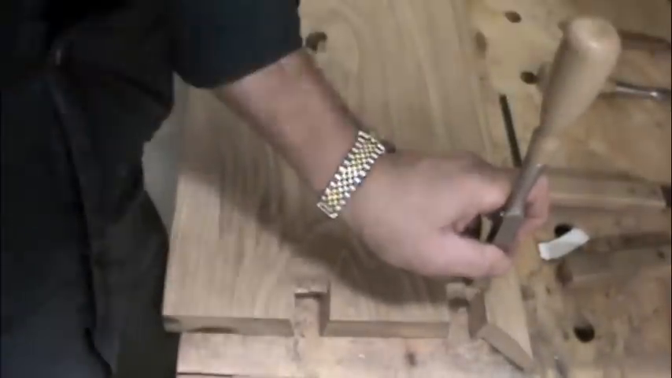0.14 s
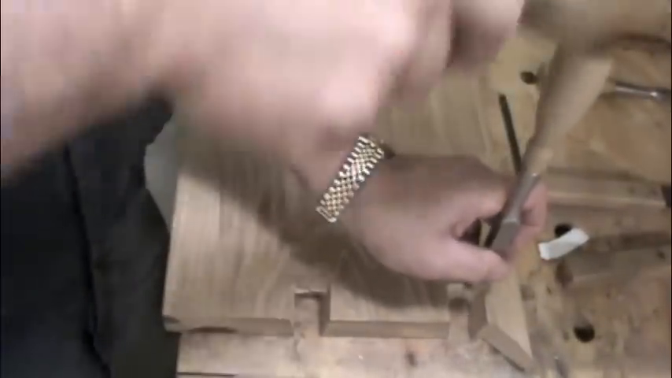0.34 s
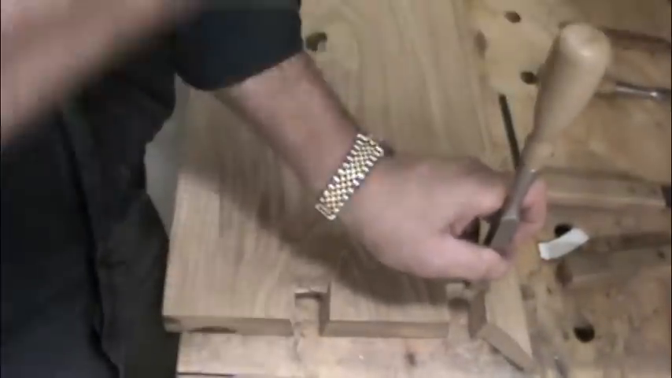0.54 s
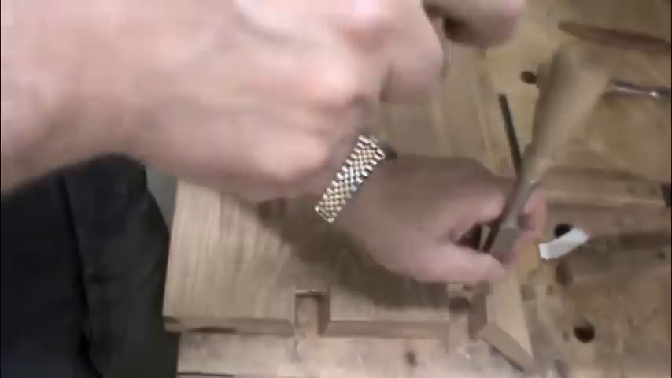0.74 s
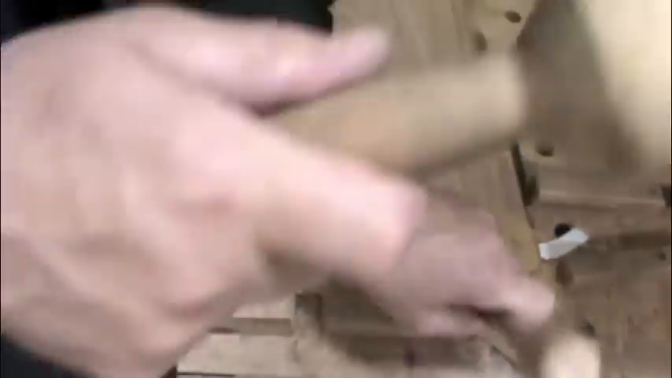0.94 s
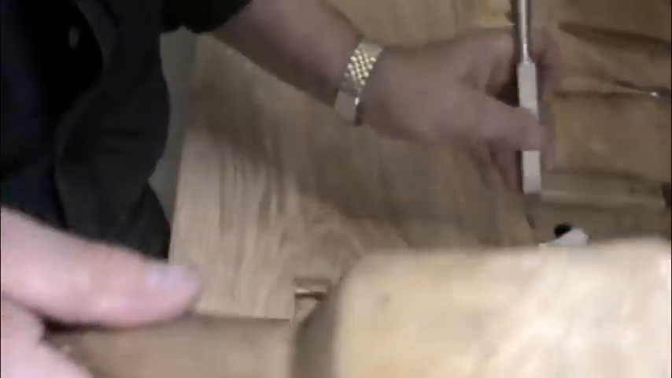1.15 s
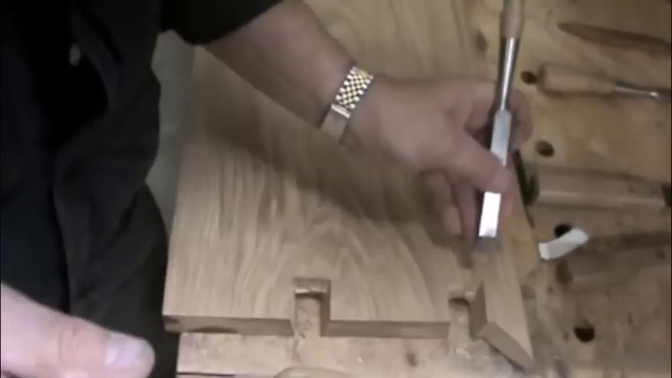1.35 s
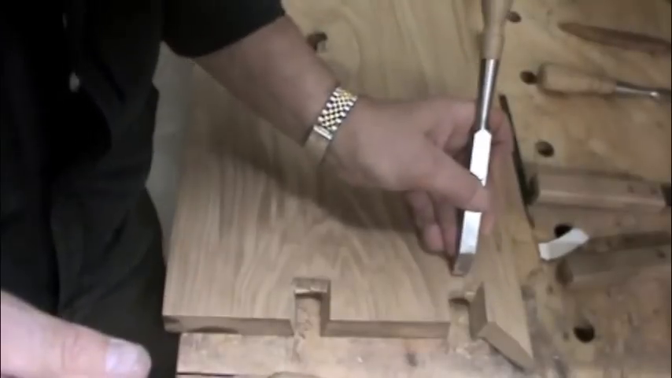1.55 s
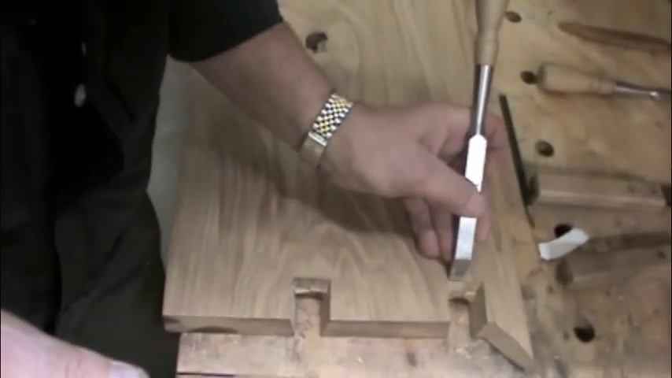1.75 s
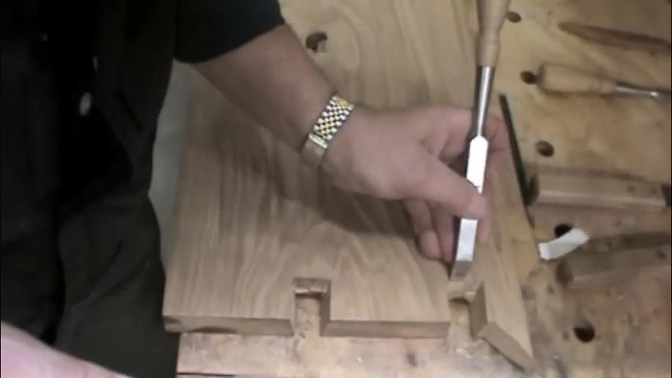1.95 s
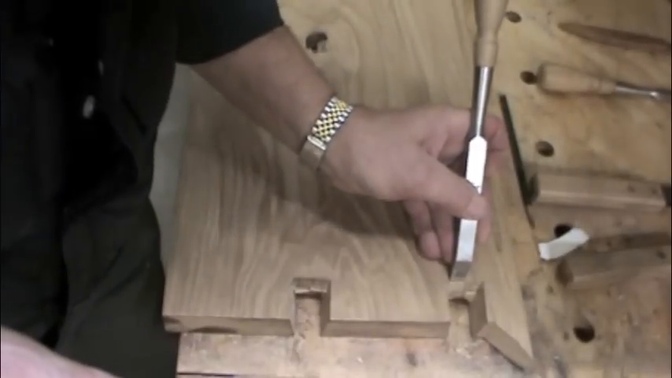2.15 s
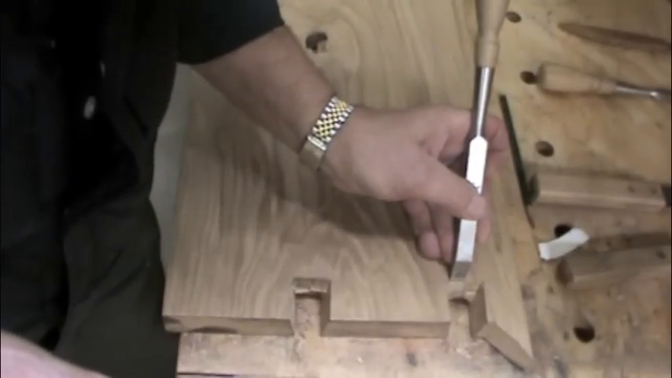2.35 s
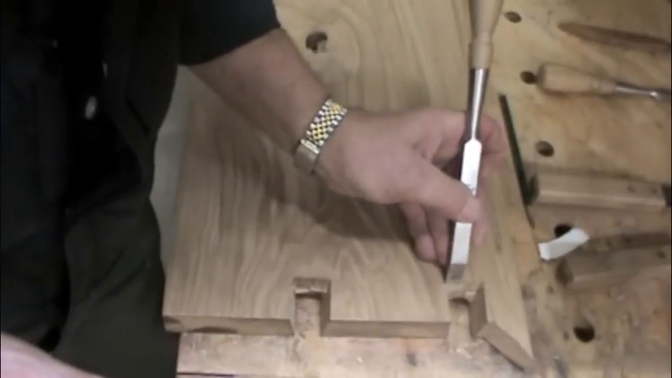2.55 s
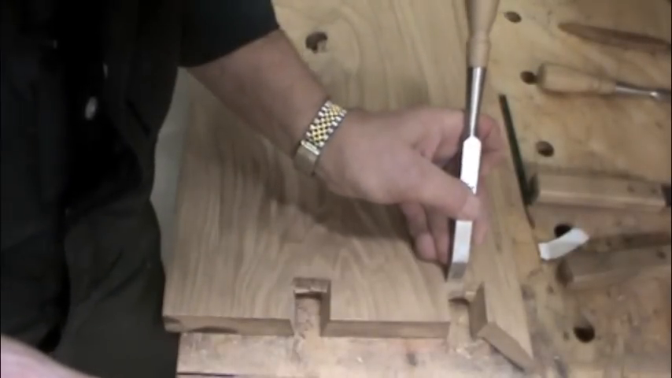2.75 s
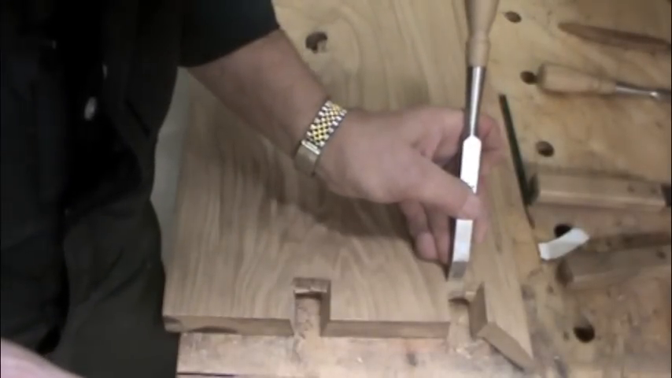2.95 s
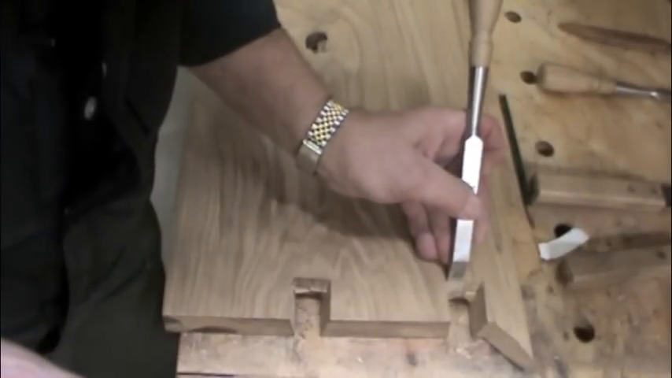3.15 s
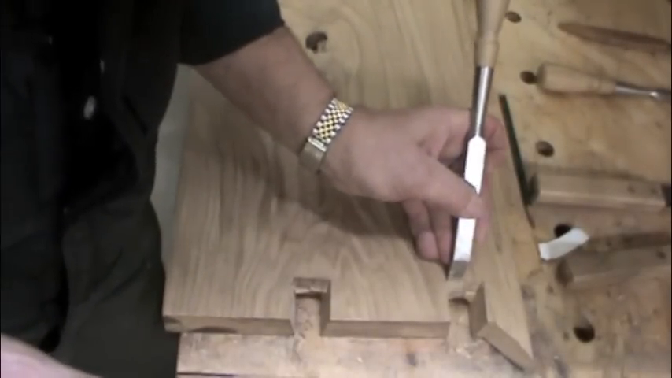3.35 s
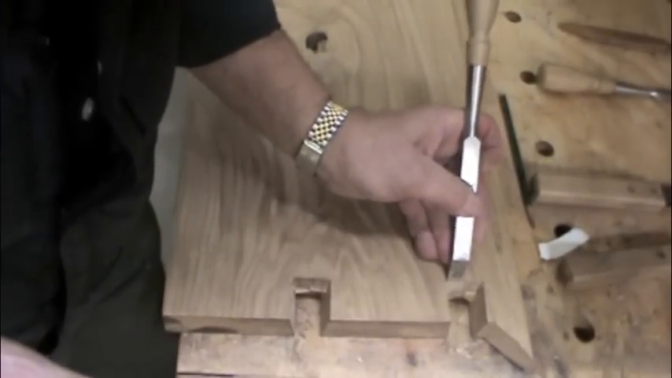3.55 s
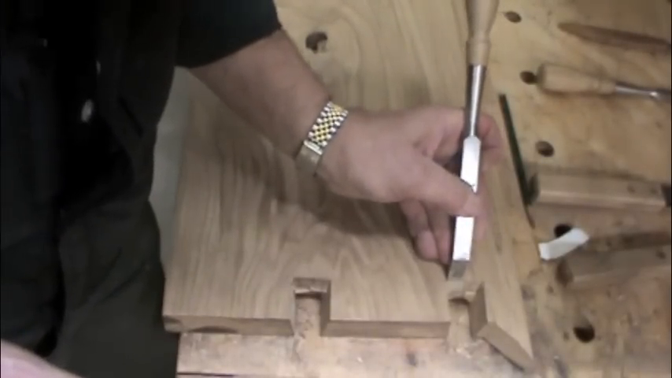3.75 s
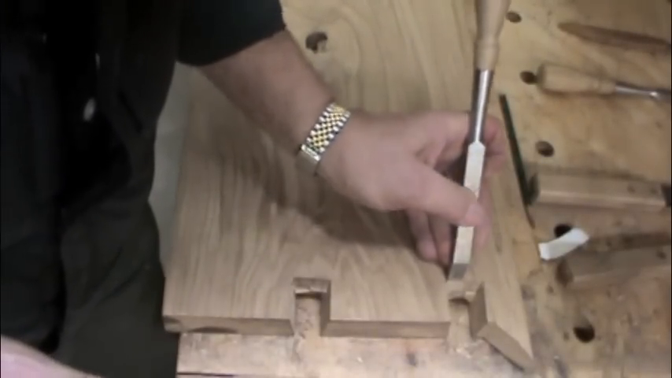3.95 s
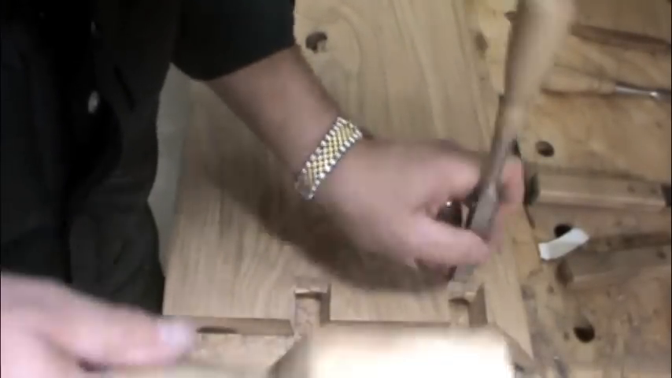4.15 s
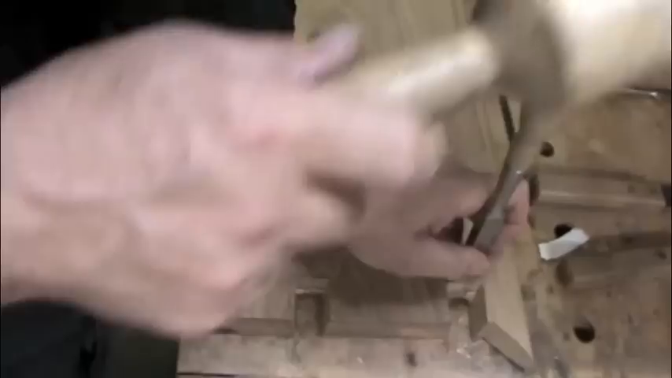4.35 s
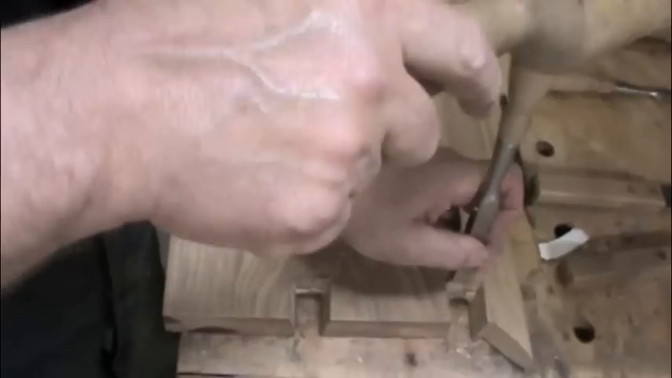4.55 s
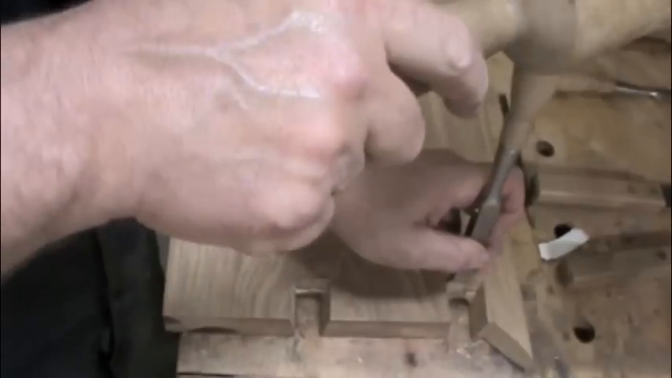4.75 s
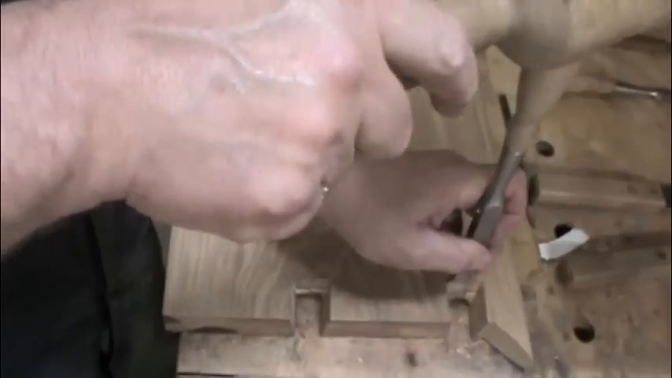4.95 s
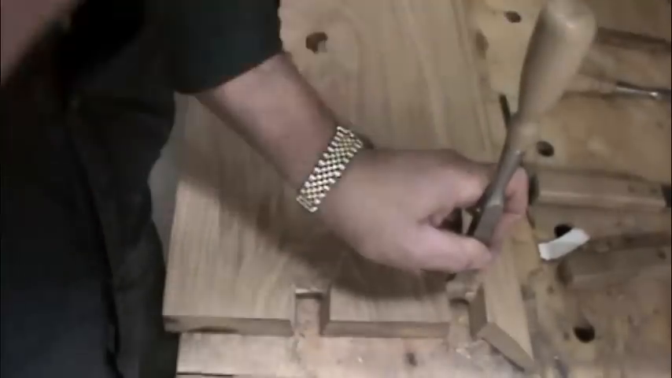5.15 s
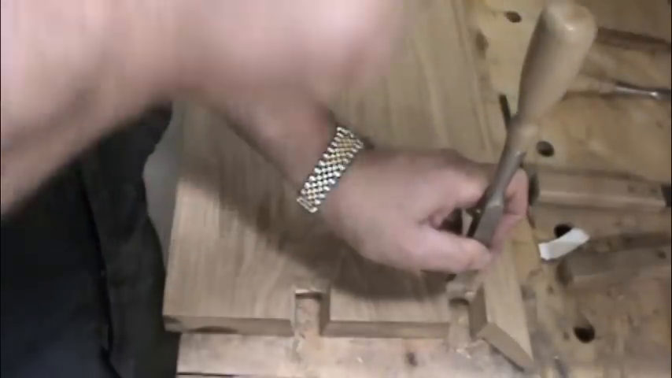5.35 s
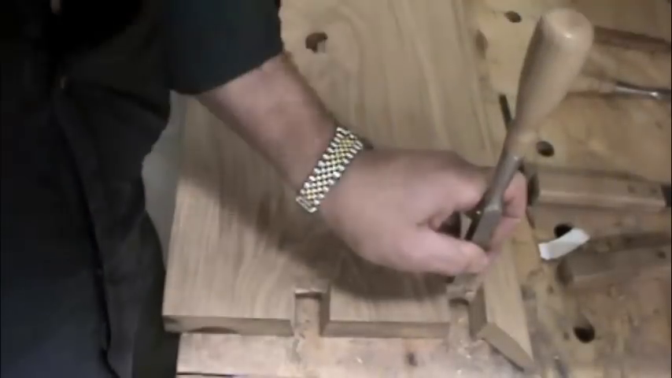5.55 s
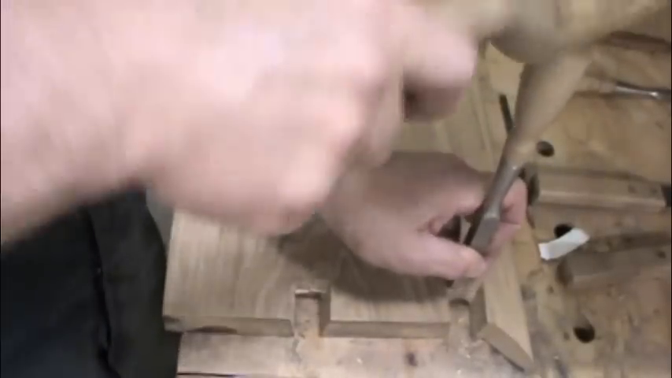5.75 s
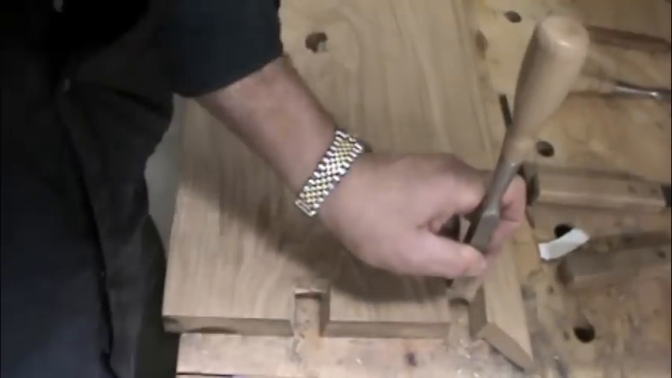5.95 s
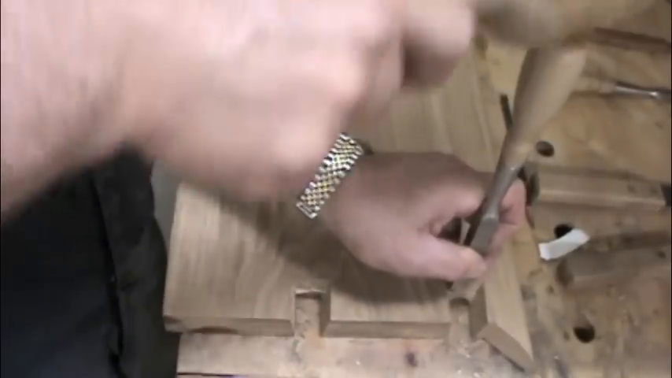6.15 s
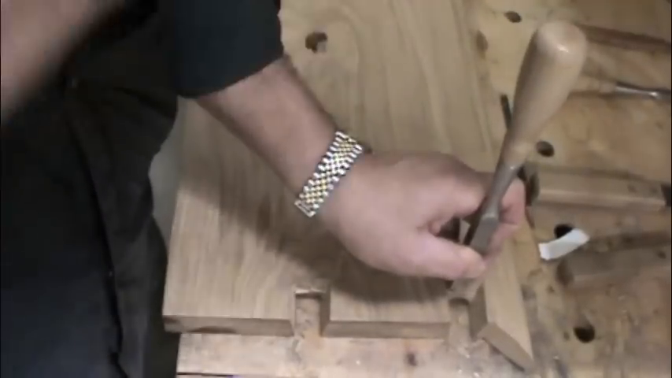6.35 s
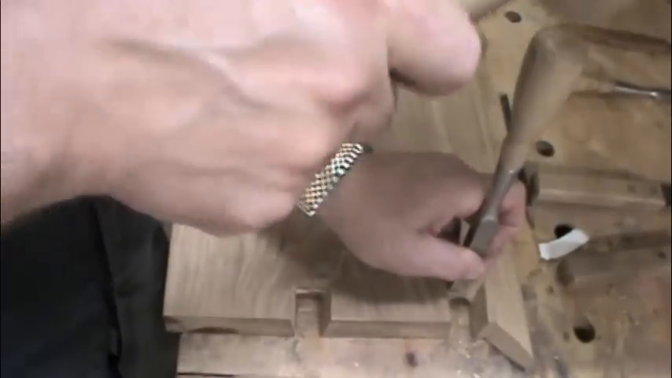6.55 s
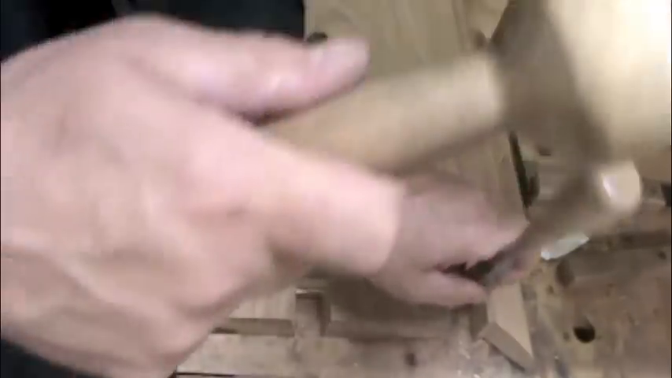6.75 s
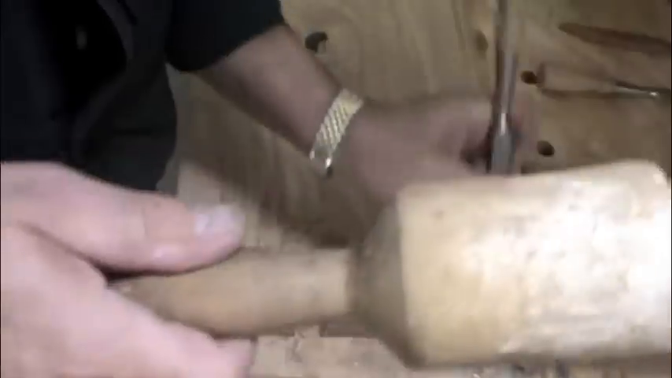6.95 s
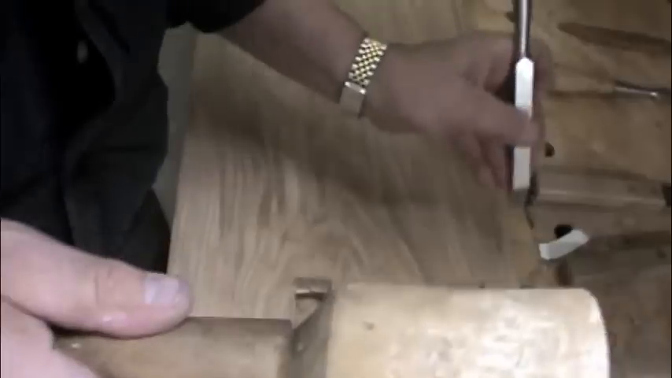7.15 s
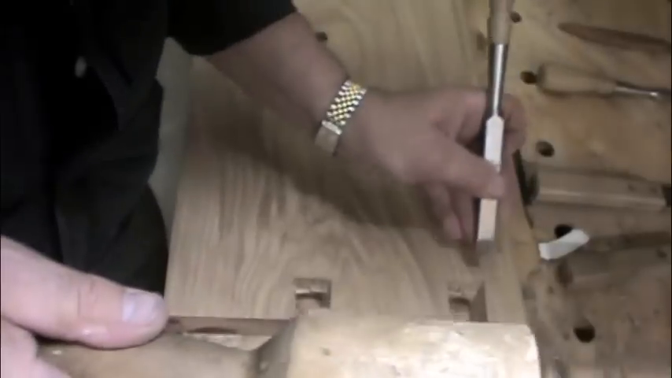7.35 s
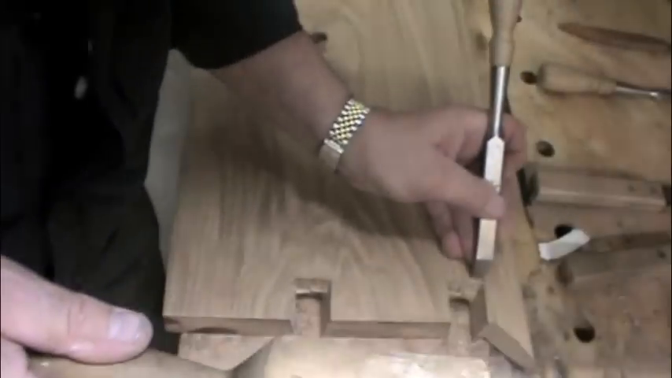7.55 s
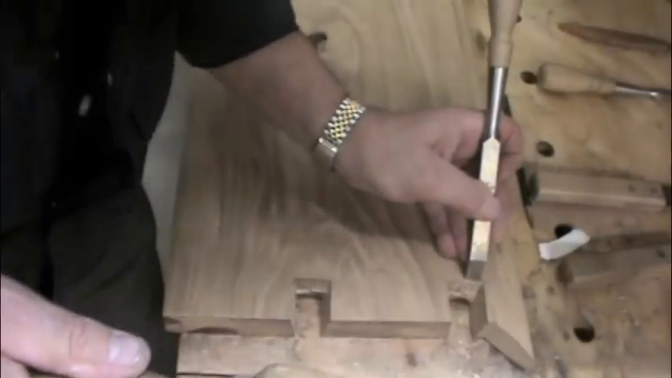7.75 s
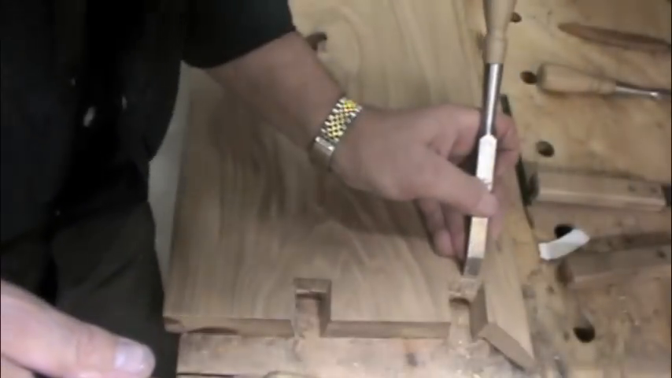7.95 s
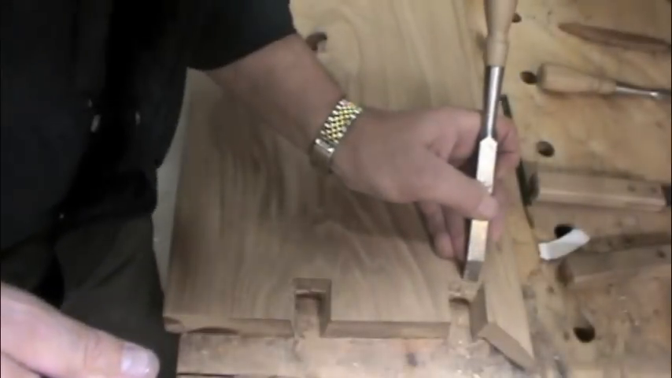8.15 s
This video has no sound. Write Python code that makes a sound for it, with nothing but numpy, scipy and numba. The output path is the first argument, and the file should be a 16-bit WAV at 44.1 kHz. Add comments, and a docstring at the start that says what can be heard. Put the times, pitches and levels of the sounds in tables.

```python
"""A wooden mallet drives a chisel on a heavy bench in a hard-walled workshop: damped bench modes, a cracking
handle and a short reverberant tail. Softer knocks thud on the bench between bursts, from the same modes
driven lower. Filtered noise makes the ticking chips, the swishing sleeve, the steady air and, with an engine
tone, the traffic outside. A fast limiter flattens the blows, so the room's answer swells as the thud dies."""
import sys
import numpy as np
from scipy import signal
from scipy.fft import rfft, irfft, next_fast_len
from scipy.io import wavfile
from scipy.ndimage import uniform_filter1d, minimum_filter1d, map_coordinates
from numba import njit

SR = 44100
rng = np.random.default_rng(int(sys.argv[2]) if len(sys.argv) > 2 else 0)


def wav_record(signal):
    """Record a signal, one row per channel, as 16-bit PCM in the file named by sys.argv[1]."""
    frames = np.transpose(np.atleast_2d(signal))
    bounded = np.clip(frames, -1, 1)
    # unit amplitude maps onto the largest positive 16-bit level
    quanta = np.round(bounded * 32767).astype(np.int16)
    wavfile.write(sys.argv[1], SR, quanta)


N = 361173

# modes of bench and board: (frequency [Hz], level under the chisel [dB], level under a blunt knock
# before its drive curve [dB], free decay time t60 [s])
BENCH_MODES = [(159.26, -8.5, -18, 0.32), (219, -6.5, -5, 0.23), (304.3, 3, -6.5, 0.16),
               (385.8, -1.5, 4.5, 0.11), (444.7, 0.5, -16, 0.16), (523.4, -4.5, -6, 0.082),
               (598.7, -5, -8, 0.18), (672.4, -4.5, -9, 0.17), (782.4, -7.5, -6.5, 0.19),
               (903, -3, -2, 0.1), (1057.7, 3.5, 4, 0.076), (1141, -10.5, -11, 0.14),
               (1374, -14.5, -11.5, 0.16), (1906, -18.5, -20, 0.29)]
# stereo width of the room's answer: (frequency [Hz], side minus mid [dB])
SHOP_WIDTH = [(60, -19), (110, -10), (200, -14), (380, -7.5), (700, -8.5), (1290, -8.5), (2380, -10.5),
              (4400, -13.5), (8120, -25), (15000, 5)]
# stereo width of the steady air and the traffic: (frequency [Hz], side minus mid [dB])
AIR_WIDTH = [(60, -35), (110, -49), (200, -27), (380, -9.5), (700, -12.5), (1290, -6), (2380, -3.5),
             (4400, -4), (8120, -14.5), (15000, -23.5)]


def amp(db):
    """Decibels to amplitude: 20 dB is a factor of ten."""
    return 10 ** (np.asarray(db) / 20)


def unit(x):
    """Scales a signal to an rms of 1."""
    return x / np.sqrt(np.mean(x ** 2) + 1e-20)


def along(points, hz):
    """Interpolates (frequency [Hz], value) points on a logarithmic frequency axis."""
    f, v = np.transpose(points)
    return np.interp(np.log(hz + 1), np.log(f + 1), v)


def curves(rows):
    """Linear interpolation in time: one value per sample for each column after the time."""
    s, *columns = np.transpose(rows)
    return [np.interp(np.arange(N) / SR, s, column) for column in columns]


def wobble(rate):
    """A smooth random modulation: a spline through random knots, rate of them a second."""
    knots = rng.standard_normal(int(N * rate / SR) + 4)
    return map_coordinates(knots, [np.arange(N) * rate / SR])


def filtered(x, response):
    """Linear filtering: the spectrum of x times a complex response of frequency."""
    n = x.shape[-1]
    padded = next_fast_len(n + 8192)
    return irfft(rfft(x, padded) * response(np.fft.rfftfreq(padded, 1 / SR)), padded)[..., :n]


def causal(spectrum, size=4096):
    """Minimum phase: folding the cepstrum packs a spectrum's energy, here 1, as early as possible."""
    level_db = along(spectrum, np.fft.rfftfreq(size, 1 / SR))
    cepstrum = irfft(np.log(amp(level_db) + 1e-6))
    cepstrum[1:size // 2] *= 2
    cepstrum[size // 2 + 1:] = 0
    impulse = irfft(np.exp(rfft(cepstrum)))[:size // 2]
    return impulse / np.linalg.norm(impulse)


def spread(pair, side):
    """Mid and side: two unrelated signals become left and right of the given width."""
    edge = filtered(pair[1], lambda hz: amp(along(side, hz)))
    return np.array([pair[0] + edge, pair[0] - edge])


def rush(spectrum, side):
    """Broadband stereo noise shaped by a spectrum, with an rms of 1."""
    noise = filtered(rng.standard_normal((2, N)), lambda hz: amp(along(spectrum, hz)))
    return unit(spread(noise, side))


def add(out, s, x):
    """Superposition: mixes x into out from time s [s] on; what falls before the start is cut."""
    k = round(s * SR)
    x = x[:, max(-k, 0):N - k]
    out[:, max(k, 0):][:, :x.shape[1]] += x


def ring(hz, db, t60, t, rise_cycles, shift, scatter_db, blur, lag):
    """Modal synthesis: damped sines build up over a number of cycles, low modes more slowly, and decay.

    Each strike scatters level and pitch; a random phase walk blurs the tone as close neighbours would.
    More lag means a later build-up."""
    level_luck, pitch_luck, phase_luck = rng.standard_normal((3, len(hz), 1))
    steps = rng.standard_normal((len(hz), len(t) // 64 + 1))  # one step every 64 samples
    drift = blur * np.sqrt(hz / SR) * np.cumsum(steps, axis=1)
    drift = np.repeat(drift, 64, axis=1)[:, :len(t)]
    drift = uniform_filter1d(drift, size=128, axis=1)
    swing = np.sin(2 * np.pi * hz * (1 + shift * pitch_luck) * t + 3 * phase_luck + drift)
    decay = amp(db + scatter_db * level_luck - 60 * t / t60)
    build_up = (1 - np.exp(-t * hz / rise_cycles)) ** lag
    return np.sum(decay * build_up * swing, axis=0)


def snap(db, t, t60):
    """Impact noise: wood meeting wood gives a dry burst that holds briefly and then decays."""
    # wood on wood, heard directly: (frequency [Hz], level [dB])
    wood = [(200, -14), (1500, 3.5), (4000, -5), (9000, -14), (12000, -23.5), (15500, -25.5)]
    hold, onset = 0.0087, 0.0011  # s
    grit = filtered(rng.standard_normal(len(t)), lambda f: amp(along(wood, f)))
    return amp(db - 60 * np.maximum(t - hold, 0) / t60) * (1 - np.exp(-t / onset)) * grit


def handle(f):
    """Resonance: broad modes of mallet and handle add to the direct response around each peak."""
    # modes of mallet and handle: (frequency [Hz], width [Hz], gain of the isolated peak [dB])
    peaks = [(407, 34, 3), (1062, 87, 1), (1393, 72, 3.5), (1864, 72, 1), (2360, 89, 2), (4290, 330, -0.5),
             (8600, 510, -1.5)]
    return 1 + sum((amp(db) - 1) * 1j * f * w / (c * c - f * f + 1j * f * w) for c, w, db in peaks)


def patches(shape, depth_db):
    """Uneven decay: a random gain field, smooth over neighbouring frequencies and moments."""
    field = uniform_filter1d(rng.standard_normal(shape), size=3, axis=0)
    field = uniform_filter1d(field, size=12, axis=1)
    return amp(depth_db * unit(field))


def shop(x, wet_db):
    """Reverberation: the walls' answer builds up, then each frequency dies at its own speed among clutter."""
    # decay time of the room: (frequency [Hz], t60 [s])
    decay = [(150, 0.65), (500, 0.65), (2000, 0.82), (5000, 0.86), (9000, 0.67), (13000, 0.34)]
    build_up = 0.0022  # s
    hz, t, z = signal.stft(rng.standard_normal((2, SR + SR // 2)), SR, nperseg=256)
    z = z * patches(z.shape[1:], depth_db=1.65)
    z = z * amp(-60 * t / along(decay, hz)[:, None])
    tail = signal.istft(z, SR, nperseg=256)[1]
    tail = tail * (1 - np.exp(-np.arange(tail.shape[1]) / SR / build_up))
    tail = spread(tail / np.linalg.norm(tail[0]), SHOP_WIDTH)
    return amp(wet_db) * signal.fftconvolve(x[None], tail, axes=1)


def leaning(x):
    """Interchannel level difference: the bench stands to the left, with a balance set by frequency."""
    # balance of the bench: (frequency [Hz], left minus right [dB])
    lean = [(60, 5), (110, 3), (200, 2), (380, 2.0), (700, 1.5), (1290, 1), (2380, -0.5), (4400, -1),
            (8120, 3), (15000, -1.5)]
    return filtered(x, lambda f: amp(along(lean, f) / 2 * np.array([[1], [-1]])))


def mallet():
    """Impact excitation: each blow snaps on the handle and rings the bench; the shop answers its crack."""
    # blows on the chisel: (time [s], thud gain [dB], snap gain [dB], extra crack treble at 8 kHz [dB])
    blows = [(-.3, 7.5, 10.5, -0.5), (0.036, 8.5, 9, 2), (.372, 8.5, 10, 1.5), (.692, 5, 11, 1),
             (5.470, 6, 7.5, 2), (5.836, 6.5, 9, 3), (6.186, 5.5, 13, 3), (6.521, 6, 13.5, 0.5)]
    # crack of mallet on handle, relative spectrum: (frequency [Hz], level [dB per Hz])
    crack_curve = [(35, -70.5), (100, -24), (156, -5), (200, -8), (420, -0.5), (1350, -2), (2600, -8.5),
                   (4200, -14.5), (6000, -21.5), (8600, -23), (9800, -30), (11000, -39), (15500, -51.5)]
    crack_db, thud_wet_db = 29.5, -10  # into the room: the crack; the thud against its direct level
    out, t = np.zeros((2, N)), np.arange(SR // 2) / SR
    hz, db, _, t60 = np.transpose(BENCH_MODES)[:, :, None]
    for s, thud_db, snap_db, treble_db in blows:
        thud = amp(thud_db) * ring(hz, db, t60, t, rise_cycles=10.9, shift=0.015,
                                   scatter_db=3.0, blur=3.87, lag=1.11)
        colour = causal([(f, level + treble_db * f / 8000) for f, level in crack_curve])
        crack = filtered(np.pad(colour, (0, len(t)))[:len(t)], handle)
        direct = thud + snap(snap_db, t, t60=0.031)
        add(out, s, direct * np.ones((2, 1)))
        add(out, s, shop(crack + amp(thud_wet_db - crack_db) * thud, wet_db=crack_db))
    return leaning(out)


def traffic():
    """Tone plus noise: a passing vehicle outside gives a wavering engine note, rumble and tyre roar."""
    # passing vehicle, before wavering: (time [s], engine pitch [Hz], engine note [dB], rumble [dB],
    # tyre roar [dB])
    passage = [(1.3, 98, -63, -57.5, -54.5), (2, 97.6, -58, -54.5, -56.5), (2.6, 95.5, -53, -53, -52.5),
               (3.15, 93, -55, -50.5, -54), (3.4, 92, -42.5, -50, -54), (3.95, 92, -45, -43.5, -49.5),
               (4.2, 91, -54.5, -45.5, -51), (4.6, 90.8, -55, -43.5, -46), (5.5, 88, -50, -48, -48),
               (7.3, 88, -80, -62, -58)]
    # relative noise spectra of rumble and of tyres: (frequency [Hz], level [dB per Hz])
    rumble = [(15, -82.5), (25, -16.5), (97, -5), (119, -1.5), (193, -2.5), (349, -17), (450, -21.5),
              (580, -47), (990, -120)]
    tyres = [(240, -26), (400, -15.5), (502, -8.5), (812, -4), (1550, -17), (1940, -18.5), (3000, -28.5),
             (3900, -77), (6600, -120)]
    octave_db = -2  # the engine's octave against the rumble
    hz, note_db, rumble_db, tyre_db = curves(passage)
    turn = 2 * np.pi * np.cumsum(hz + .9 * wobble(12)) / SR
    note = amp(note_db + 1.1 * wobble(8.7)) * np.sin(turn)
    octave = amp(rumble_db + octave_db + 2.5 * wobble(12)) * np.sin(2 * turn)
    low = amp(rumble_db + 1.7 * wobble(3.1)) * rush(rumble, AIR_WIDTH)
    return note + octave + low + amp(tyre_db) * rush(tyres, AIR_WIDTH)


def air():
    """Stationary noise: the still air of the shop and equipment hiss share one steady spectrum."""
    # relative spectrum of air and hiss: (frequency [Hz], level [dB per Hz])
    floor = [(15, -38), (25, -3), (110, 3.5), (361, -4), (402, -1), (485, -13), (951, -9.5), (1210, -12.5),
             (1680, -15.5), (1870, -9), (2080, -16.5), (4080, -16), (4540, -17.5), (8680, -16.5),
             (15700, -22.5)]
    return amp(-56.5) * rush(floor, AIR_WIDTH)


def sleeve():
    """Friction noise: cloth rubs on cloth in small grains while each stroke of the arm swells and fades."""
    # strokes of the arm: (start [s], loudest moment [s], end [s], peak before the grain [dB])
    strokes = [(1.15, 1.319, 1.4, -50.5), (4.191, 4.339, 4.62, -36), (4.6, 4.68, 4.84, -50),
               (4.83, 4.943, 5.05, -53), (5.05, 5.244, 5.37, -42), (5.34, 5.45, 5.5, -39),
               (6.8, 7.0, 7.3, -51.5), (7.35, 7.52, 7.68, -57)]
    # relative spectrum of the rubbing cloth: (frequency [Hz], level [dB per Hz])
    cloth = [(180, -47), (300, -1.5), (385, -18.5), (477, -2), (572, -10), (746, -7), (1110, -5.5),
             (1520, -5), (2150, -7), (3910, -4.5), (5620, -10), (8650, -6), (15700, -22.5)]
    edge_db, bend = -16, 2.3  # start and end against the peak; how late the level drops there
    t, stroke = np.arange(N) / SR, 0
    for start, top, end, db in strokes:
        away = np.maximum((top - t) / (top - start), (t - top) / (end - top))
        stroke = stroke + amp(db + edge_db * away ** bend)
    grain = amp(0.71 * wobble(43) + 0.92 * wobble(300))
    return stroke * grain * rush(cloth, SHOP_WIDTH)


def chips():
    """Resonant filtering: a light chip's click is a short spatter of noise through one resonance, twice."""
    # chips and small ticks: (time [s], direct peak [dB], pitch [Hz], width [share of the pitch])
    ticks = [(1.249, -36, 6980, .8), (1.521, -42.5, 8500, .6), (1.797, -40.5, 9920, 0.54),
             (3.849, -45, 6500, .6), (3.948, -43, 2310, 0.1), (4.239, -33, 3840, 0.078),
             (5.339, -33, 4170, 0.16), (6.8144, -22, 9330, 0.44), (6.9435, -28, 8000, 0.27),
             (7.0779, -14, 9530, 0.65), (7.1716, -33.5, 12030, 0.47), (7.2343, -39, 9000, 0.62),
             (7.405, -46, 8000, .8), (7.5818, -41.5, 9900, 0.73)]
    out, t = np.zeros((2, N)), np.arange(SR // 20) / SR
    for s, db, hz, width in ticks:
        noise = amp(-60 * t / 0.0063) * rng.standard_normal(len(t))
        click = filtered(noise, lambda f: (1j * f * width * hz / (hz * hz - f * f + 1j * f * width * hz)) ** 2)
        click = amp(db) * click / np.abs(click).max()
        add(out, s, click * np.ones((2, 1)))
        add(out, s, shop(click, wet_db=-12.5))
    return out


def knocks():
    """Selective excitation: a blunt knock drives the low bench modes and makes loose tools chatter."""
    # knocks on the bench top: (time [s], thud gain [dB], direct push gain [dB], snap gain [dB],
    # first rattle gain [dB], best-driven pitch [Hz], fall-off [dB per octave], build-up [cycles],
    # ring length [share of the free bench])
    strikes = [(3.672, -22.5, -8, -62, -70, 322, 11.5, 2.7, 0.65),
               (3.9522, -15.5, 5.5, -50.5, -70, 303, 11.5, 1.2, 0.62),
               (4.645, 12.5, 22, -22.5, -22.5, 240, 6.5, 9.6, 0.9),
               (5, 11.5, 19.5, -22.5, -36, 265, 8, 9.1, .8)]
    # loose tools on the bench: (frequency [Hz], level [dB], decay time t60 [s])
    steel = [(2620, 5.5, 0.056), (3640, -2, 0.054), (4640, -12, 0.12), (6000, -15, 0.069),
             (7300, -14, 0.057)]
    room_push_db = 28  # air pushed into the room by the bench face, over the thud
    out, t = np.zeros((2, N)), np.arange(SR // 2) / SR
    hz, _, db, t60 = np.transpose(BENCH_MODES)[:, :, None]
    # the broad face of the bench pushes the air once
    push = filtered(1. * (t == 0), lambda f: (1j * f / (260 + 1j * f)) ** 2 / (1 + 1j * f / 1400) ** 4)
    for s, thud_db, push_db, snap_db, rattle_db, best_hz, fall_db, rise, share in strikes:
        drive_db = -fall_db * np.abs(np.log2(hz / best_hz))
        thud = amp(thud_db) * ring(hz, db + drive_db, share * t60, t, rise, shift=0.014,
                                   scatter_db=4.0, blur=3.36, lag=1.7)
        click = snap(snap_db, t, t60=0.02)
        add(out, s, (thud + click + amp(push_db) * push) * amp([[.6], [-.6]]))  # slightly left
        add(out, s, shop(thud + amp(7.0) * click + amp(thud_db + room_push_db) * push, wet_db=-13.0))
        for bounce in range(4):  # the tools jump and touch down again, each time weaker
            chink = ring(*np.transpose(steel)[:, :, None], t, rise_cycles=11.0, shift=0.0049,
                         scatter_db=4.0, blur=2.7, lag=1.1)
            touch = s + 0.0059 + 0.02 * (bounce + .6 * rng.random())
            add(out, touch, amp(rattle_db - 6.7 * bounce) * chink * np.ones((2, 1)))
    return leaning(out)


def scene():
    """Superposition: the sources sound together and simply add."""
    return mallet() + traffic() + air() + sleeve() + chips() + knocks()


@njit
def follow(level, rise, fall):
    """Envelope following: one-pole smoothing, quick to rise and slower to fall."""
    out, held = np.empty_like(level), level[0]
    for i in range(len(level)):
        held += (level[i] - held) * (rise if level[i] > held else fall)
        out[i] = held
    return out


def record(dry):
    """Dynamic compression: a limiter holds loud sound down, soft clipping catches overshoot, then a band limit."""
    attack, release = 0.0011, 0.012  # s
    ceiling_db, top_hz = -5, 15850
    ahead = -minimum_filter1d(-np.abs(dry).max(axis=0), size=31)  # it looks a moment ahead
    level = follow(ahead, 1 / (attack * SR), 1 / (release * SR))
    held = dry / (1 + (level / amp(ceiling_db)) ** 3) ** (0.94 / 3)
    clipped = held / (1 + np.abs(held / .95) ** 4) ** (1 / 4)
    return filtered(clipped, lambda hz: hz < top_hz)


dry = scene()
out = record(dry)
wav_record(out)
```